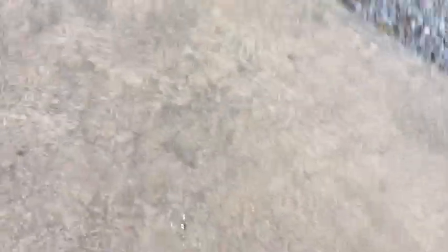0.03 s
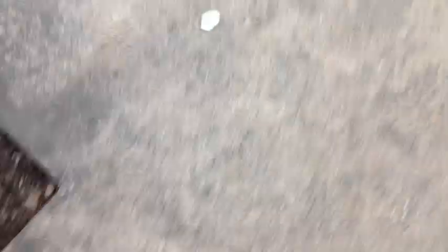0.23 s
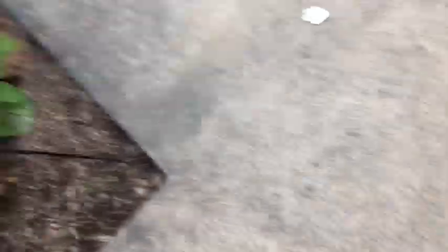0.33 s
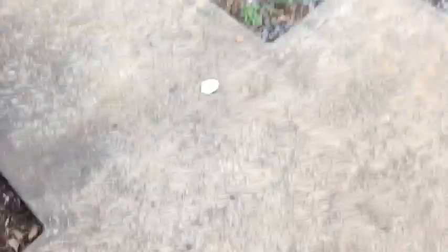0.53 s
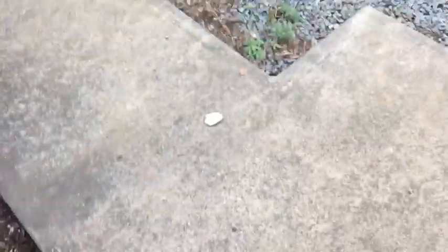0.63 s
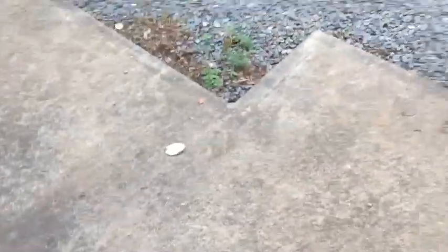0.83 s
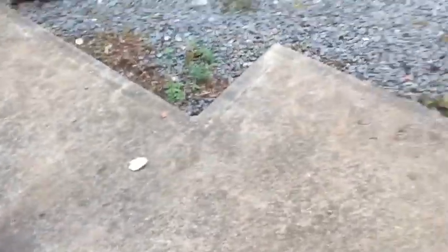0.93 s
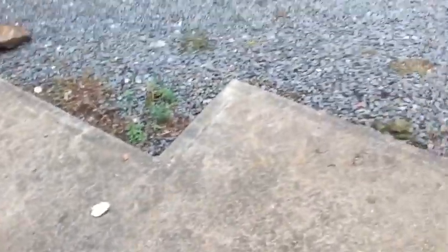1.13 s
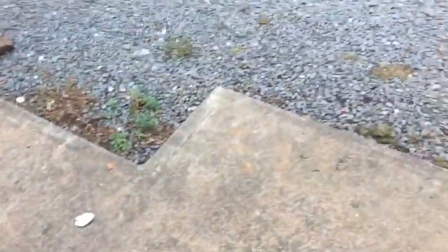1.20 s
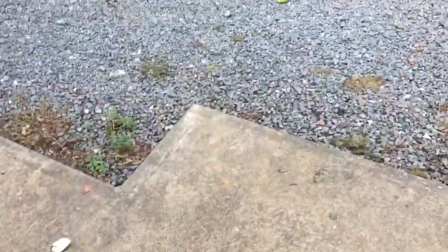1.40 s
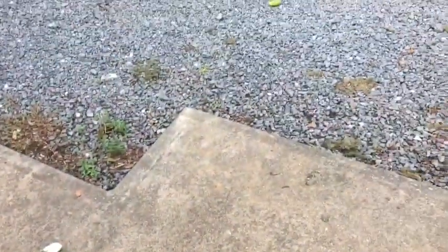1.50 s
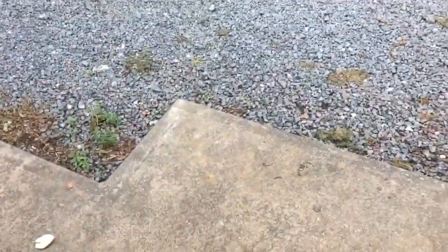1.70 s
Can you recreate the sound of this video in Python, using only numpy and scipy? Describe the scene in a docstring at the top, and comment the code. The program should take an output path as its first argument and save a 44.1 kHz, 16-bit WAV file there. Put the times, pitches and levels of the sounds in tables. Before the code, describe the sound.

One loud, sharp pop is the main sound. Faint gritty scuffs and soft microphone bumps lead in, then at about 0.2 seconds something brittle bursts close by over concrete, with a crack and a hollow puff of air that echoes briefly around the yard. Faint taps and scuffs come near 0.7 and 0.85 seconds, soft bumps around 1.1. Light wind, hiss and a faint distant hum last until about 1.75.

```python
"""Light wind, outdoor hiss, soft bumps on the moving microphone and faint gritty scuffs and taps come first.
Then something brittle bursts close by over a concrete slab: three quick snaps and a hollow pop of air.
Nearby surfaces throw the sound back and it dies away in the yard.
More scuffs, taps and bumps follow, while a distant hum grows a little louder."""
import sys
import numpy as np
from scipy import signal
from scipy.fft import rfft, irfft, next_fast_len
from scipy.io import wavfile

SR = 44100
rng = np.random.default_rng(int(sys.argv[2]) if len(sys.argv) > 2 else 0)


def waveform_to_disk(signal):
    """Save audio, clipped to [-1, 1], as 16-bit WAV at the path in sys.argv[1]."""
    frames = np.transpose(np.atleast_2d(signal))
    scaled = np.clip(frames, -1, 1) * 32767
    samples = np.round(scaled).astype(np.int16)
    wavfile.write(sys.argv[1], SR, samples)


N = 77175
T = np.arange(N) / SR

# the tone of grit on concrete: pitch_hz, level_db
GRIT_COLOUR = [(100, -0.5), (280, 3.5), (550, -3), (1200, -1.5), (1950, 3), (2400, -1.5), (2850, -12),
               (3700, -2.5), (4800, -14), (5800, -6), (7200, -11.5), (8600, -3), (10500, -11.5),
               (12500, -8.5), (16000, -11.5)]


def from_db(db):
    """Turn decibels into a number to multiply by."""
    return 10 ** (np.asarray(db) / 20)


def unit_power(x):
    """Scale a sound so that its average power is 1."""
    return x / np.sqrt(np.mean(x ** 2) + 1e-20)


def level(rows):
    """A volume curve through rows of time_s, level_db."""
    return from_db(np.interp(T, *np.transpose(rows)))


def colour(x, points):
    """Give a sound its tone: make each pitch stronger or weaker, by rows of pitch_hz, level_db."""
    size = 2 * next_fast_len(N)
    hz, db = np.transpose(points)
    pitches_hz = np.arange(size // 2 + 1) * SR / size
    gain = unit_power(from_db(np.interp(np.log(pitches_hz + 1), np.log(hz), db)))
    # these steps make the filter ring only after a sound, never before it
    cepstrum = irfft(np.log(gain))
    cepstrum[1:size // 2] *= 2
    cepstrum[size // 2 + 1:] = 0
    return irfft(rfft(x, size) * np.exp(rfft(cepstrum)))[:N]


def dull(x, top_hz):
    """Soften everything above top_hz."""
    return signal.sosfilt(signal.butter(2, top_hz, fs=SR, output="sos"), x + 1e-18)


def band(x, low_hz, top_hz):
    """Keep the pitches between two limits, at an average power of 1."""
    band_pass = signal.butter(2, [low_hz, top_hz], "band", fs=SR, output="sos")
    return unit_power(signal.sosfilt(band_pass, x))


def envelope(start_s, fade_s, rise_s, hold_s=0):
    """A volume curve that rises, holds, then drops 60 dB in every fade_s."""
    age = T - start_s
    return np.clip(age / rise_s, 0, 1) * 1000. ** -np.clip((age - rise_s - hold_s) / fade_s, 0, 5)


def wind():
    """Light wind makes a low, uneven rumble."""
    # the gusts: time_s, level_db
    gusts = [(0.0, -35), (0.038, -56), (0.214, -44.5), (0.248, -58.5), (0.482, -46), (0.638, -57),
             (0.682, -42.5), (0.72, -58), (0.994, -50.5), (1.042, -58), (1.134, -45.5), (1.178, -56.5),
             (1.49, -57), (1.534, -69), (1.618, -53), (1.75, -69)]
    # the rumble's tone: pitch_hz, level_db
    tone = [(20, -7), (40, -3.5), (60, 6), (100, -4.5), (200, -15.5), (400, -33.5), (1000, -61)]
    return from_db(-0.5) * level(gusts) * colour(rng.standard_normal(N), tone)


def outdoor_hiss():
    """The soft, nearly steady noise of the open air."""
    # its volume: time_s, level_db
    volume = [(0, -53.5), (.5, -56), (.95, -55.5), (1.3, -57.5), (1.75, -56.5)]
    # its tone: pitch_hz, level_db
    tone = [(30, -2), (150, 5), (330, 0.5), (480, -4.5), (620, -1.5), (900, -8), (1500, -8), (2200, -9.5),
            (2800, -18.5), (3800, -13.5), (4700, -25.5), (6500, -24.5), (8500, -19.5), (10000, -20),
            (12500, -16), (16000, -18)]
    return level(volume) * colour(rng.standard_normal(N), tone)


def distant_hum(pitch_hz=324.6, waver_hz=26):
    """One far-off note that wavers at random."""
    # its volume: time_s, level_db
    volume = [(0, -70), (.85, -64), (1.0, -65.5), (1.25, -59.5), (1.75, -60.5)]
    waver = dull(rng.standard_normal(N), waver_hz) + 1j * dull(rng.standard_normal(N), waver_hz)
    note = np.exp(2j * np.pi * pitch_hz * T)
    return level(volume) * unit_power(np.real((1 + waver / np.std(waver)) * note))


def high_hiss():
    """A faint, thin hiss comes and goes."""
    # its volume: time_s, level_db
    volume = [(0, -76), (.45, -76), (.7, -69.5), (.95, -65), (1.2, -76), (1.75, -80)]
    # its tone: pitch_hz, level_db
    tone = [(2500, -19), (4200, -8), (4900, -4), (5600, -2), (6200, -5.5), (7500, -16), (9000, -12.5),
            (12000, -28)]
    return level(volume) * colour(rng.standard_normal(N), tone)


def microphone_bumps():
    """Bumps on the moving microphone make soft, low thuds, each only a few swings long."""
    # the thuds: peak_s, level_db, pitch_hz, width_s
    bumps = [(.004, -31, 277, 0.01), (0.154, -37.5, 210, 0.0069), (0.183, -42, 245, .005),
             (0.6785, -34.5, 98, 0.0048), (0.981, -36, 65.7, 0.012), (1.077, -38.5, 85, 0.0059),
             (1.129, -34.5, 72, 0.02), (1.127, -33.5, 150.4, 0.0048)]
    return sum(from_db(db) * np.exp(-((T - peak) / width) ** 2) * np.sin(2 * np.pi * hz * (T - peak))
               for peak, db, hz, width in bumps)


def scuffs(grains_per_s=5000, spread_db=3.5):
    """Grit rubs on the slab: a crowd of tiny, uneven clicks swells and fades."""
    # the rubs: peak_s, level_db, rise_s, fall_s, low_hz, top_hz
    rubs = [(.006, -48.5, 0.013, 0.0059, 900, 4020), (.094, -52, 0.03, 0.022, 1210, 3974),
            (0.137, -42.5, 0.02, 0.044, 120, 1960), (0.149, -36, 0.0093, 0.0074, 1260, 8400),
            (.209, -44.5, 0.0087, .004, 1500, 3600), (.712, -49.5, 0.0059, 0.016, 983, 15000),
            (0.859, -45.5, 0.0064, 0.0086, 3560, 14900)]
    sizes = from_db(spread_db * np.minimum(rng.exponential(1, N), 4))
    clicks = sizes * rng.choice([-1, 1], N) * (rng.random(N) < grains_per_s / SR)
    grit = colour(clicks, GRIT_COLOUR)
    sound = np.zeros(N)
    for peak, db, rise, fall, low, top in rubs:
        swell = np.exp(-((T - peak) / np.where(T < peak, rise, fall)) ** 2)
        sound += from_db(db) * swell * band(grit, low, top)
    return sound


def taps():
    """Small, gritty knocks that die at once, each in its own range of pitches."""
    # the knocks: start_s, level_db, fade_s, low_hz, top_hz
    knocks = [(0.0509, -38.5, 0.0091, 545, 1300), (0.0945, -44.5, 0.0083, 1510, 4460),
              (0.1089, -43.5, 0.019, 2980, 4960), (0.1275, -37, 0.018, 800, 7950),
              (0.1475, -38, 0.0042, 1490, 13000), (0.1561, -34.5, 0.018, 5400, 6270),
              (0.178, -44, 0.011, 4800, 11160), (.3012, -38, 0.013, 400, 1100),
              (0.3274, -46, .02, 400, 6000), (0.7015, -35, 0.015, 585, 14100),
              (.7110, -45, .012, 6000, 15000), (0.7166, -39.5, 0.0067, 910, 5040),
              (0.8444, -41.5, 0.0088, 1600, 13930), (0.8501, -41, 0.0097, 900, 7060),
              (1.126, -47, 0.029, 1400, 2330)]
    contact = colour(rng.choice([-1., 1.], N), GRIT_COLOUR)
    return sum(from_db(db) * envelope(start, fade, rise_s=.0004) * band(contact, low, top)
               for start, db, fade, low, top in knocks)


def snaps():
    """The brittle shell snaps: each snap is a run of tiny cracks a millisecond or two long."""
    # the snaps: start_s, level_db, hold_s, fade_s
    cracks = [(0.2112, -10, 0.0015, 0.0078), (0.2156, -18.5, .0007, 0.0077), (0.2219, -12, 0.0022, 0.0046)]
    # their tone: pitch_hz, level_db
    tone = [(60, -20.5), (170, -11.5), (370, -5), (510, -16), (680, -2), (1000, 2.5), (1350, 1.5),
            (1720, -5), (2050, 4.5), (2850, -11.5), (3700, -3.5), (5300, -15), (6500, -5), (7800, -14.5),
            (9000, -11), (10800, -19.5), (12000, -11), (15500, -24.5)]
    force = sum(from_db(db) * envelope(start, fade, rise_s=.0001, hold_s=hold)
                for start, db, hold, fade in cracks)
    return colour(force * rng.choice([-1, 1], N), tone)


def pop(start_s=0.22425, peak_db=0.5):
    """One sudden push of air, gone after two or three swings."""
    # its hollow tone: pitch_hz, level_db
    tone = [(60, -30.5), (200, -19), (350, -10.5), (480, -20.5), (660, -0.5), (1000, -1), (1420, 4.5),
            (1720, -5), (2000, -8), (2400, -20), (2900, -18), (3600, -34.5), (5500, -42.5), (16000, -61)]
    push = np.interp(T - start_s, [-1 / SR, 0, 1 / SR], [0, -1, 0])
    pulse = colour(push, tone)
    return from_db(peak_db) * pulse / np.abs(pulse).max()


def yard(burst):
    """Surfaces send back dull echoes; the rest scatters into a short near tail and a faint far one."""
    # single echoes: delay_s, level_db, top_hz
    bounces = [(.0036, -22, 2500), (.0098, -18, 2800), (.0208, -19, 2800), (0.2105, -38.5, 2500)]
    # tails of scattered sound: level_db, fade_s, rise_s
    tails = [(-16, 0.11, .008), (-30.5, 1.0, 0.041)]
    # the tails' tone: pitch_hz, level_db
    tone = [(100, -16), (200, -9.5), (350, -1), (500, -9.5), (720, -4.5), (1400, 2), (2300, -7.5),
            (2900, -11.5), (3600, -8.5), (4700, -22), (6500, -19), (9000, -21.5), (11000, -30.5),
            (16000, -33.5)]
    echoes = sum(from_db(db) * np.interp(T - delay, T, dull(burst, top), left=0)
                 for delay, db, top in bounces)
    decay = sum((from_db(db) * unit_power(envelope(0, fade, rise))) ** 2 for db, fade, rise in tails) / N
    tail_power = np.maximum(signal.fftconvolve(burst ** 2, decay)[:N], 0)
    return echoes + np.sqrt(tail_power) * colour(rng.standard_normal(N), tone)


def scene():
    """Mix the burst, its echoes and the small sounds around it into one channel."""
    burst = snaps() + pop()
    events = burst + yard(burst) + scuffs() + taps() + microphone_bumps()
    background = wind() + outdoor_hiss() + distant_hum() + high_hiss()
    return (events + background)[None]


def record(dry, peak_limit=0.96, top_hz=15900):
    """Round off the loudest peaks and cut the very highest treble."""
    rounded = dry / (1 + (dry / peak_limit) ** 4) ** .25
    return signal.sosfilt(signal.ellip(12, .1, 90, top_hz, fs=SR, output="sos"), rounded)


dry = scene()
out = record(dry)
waveform_to_disk(out)
```